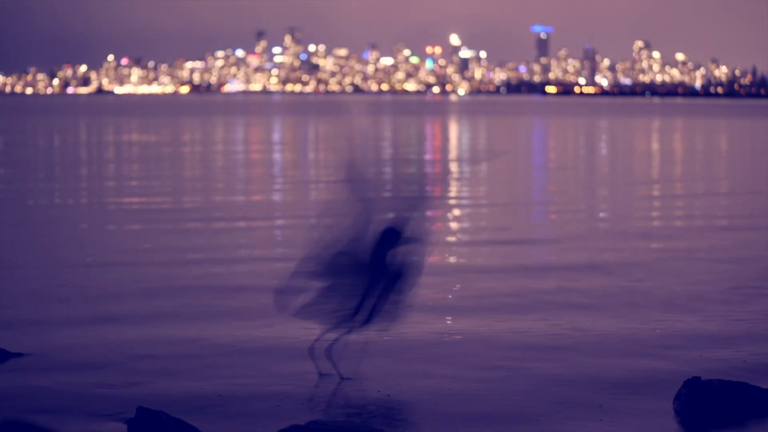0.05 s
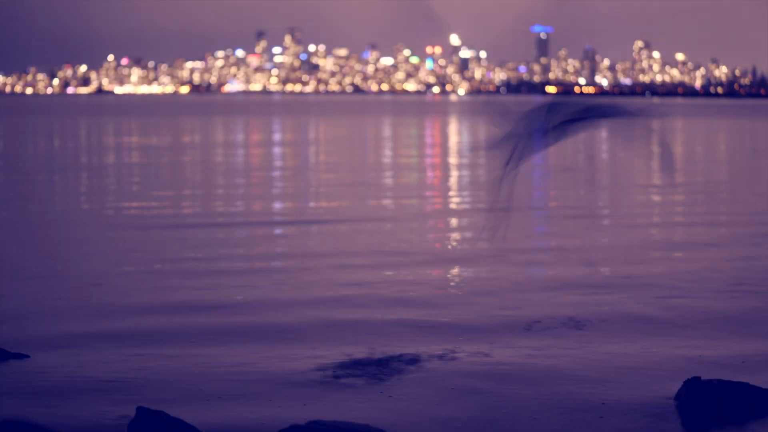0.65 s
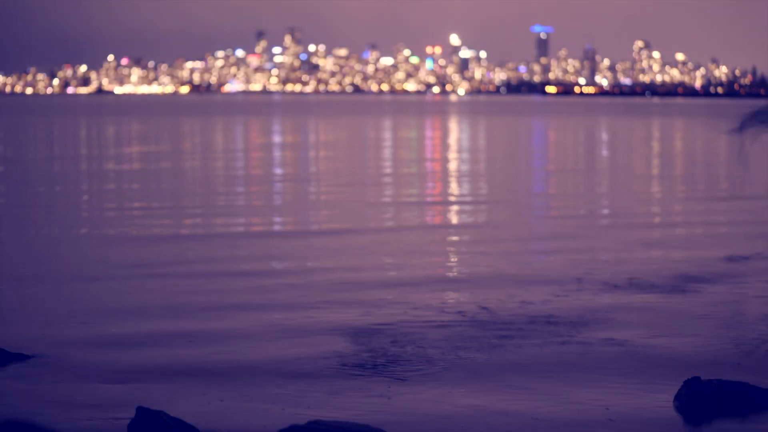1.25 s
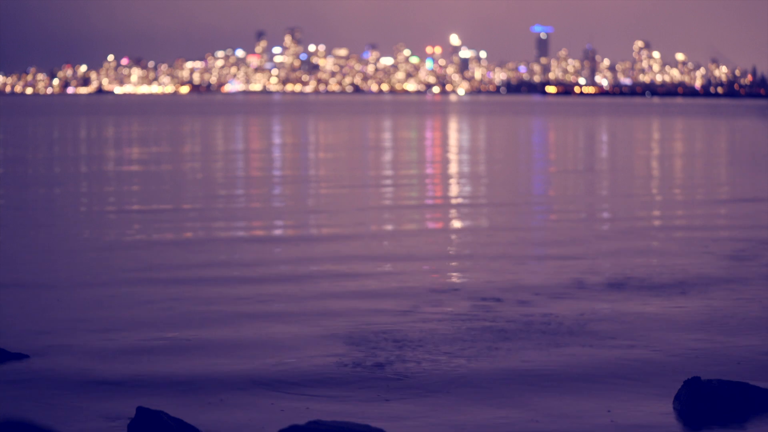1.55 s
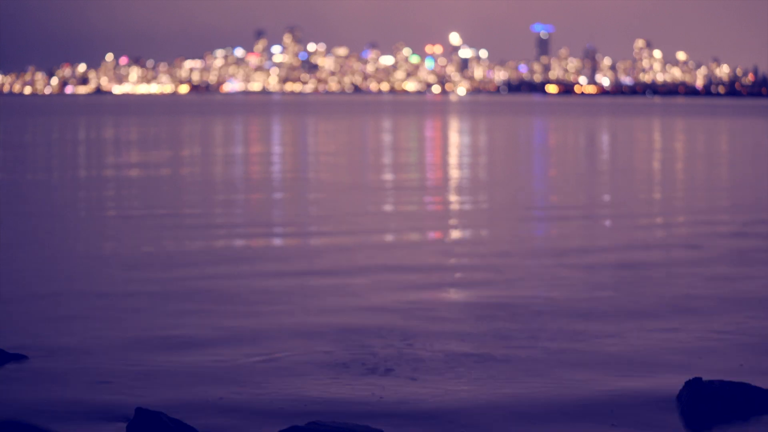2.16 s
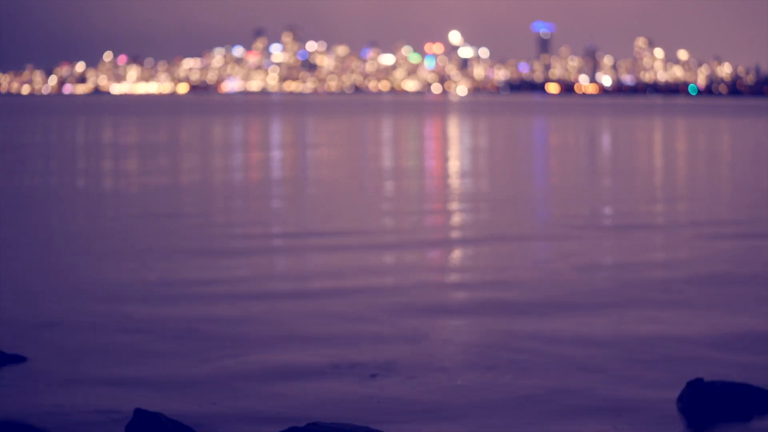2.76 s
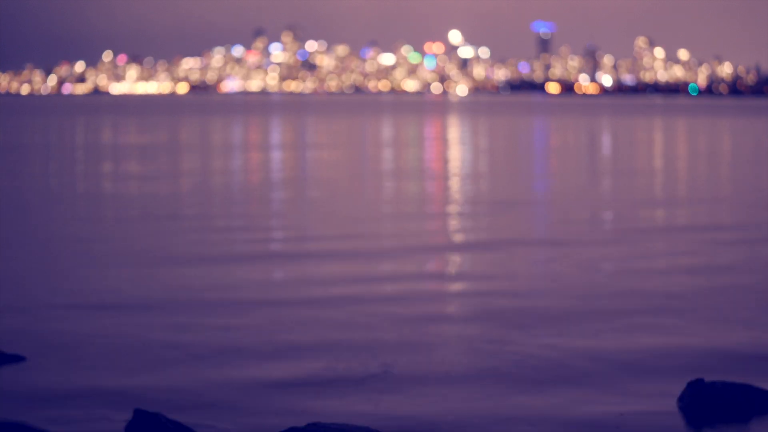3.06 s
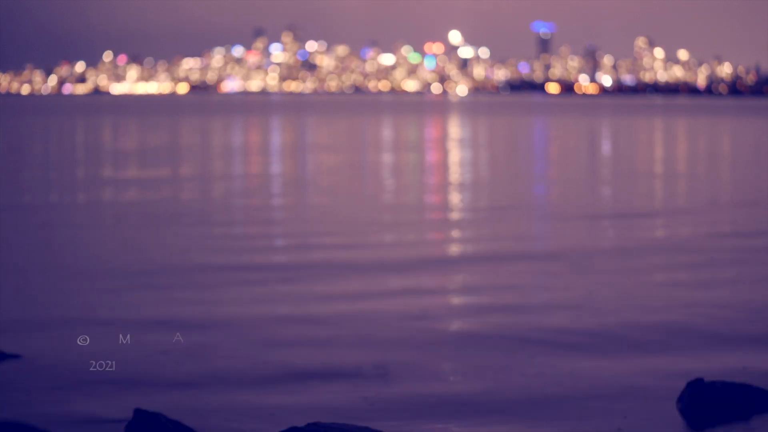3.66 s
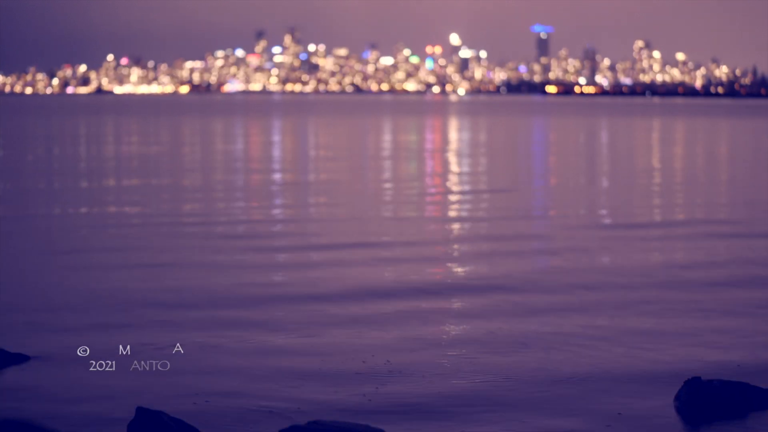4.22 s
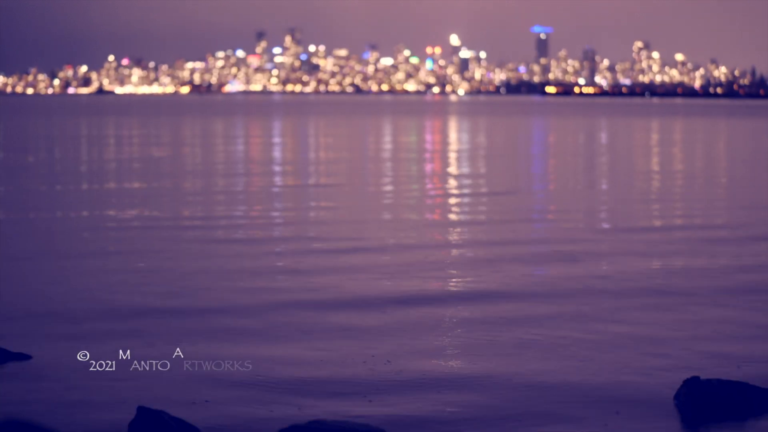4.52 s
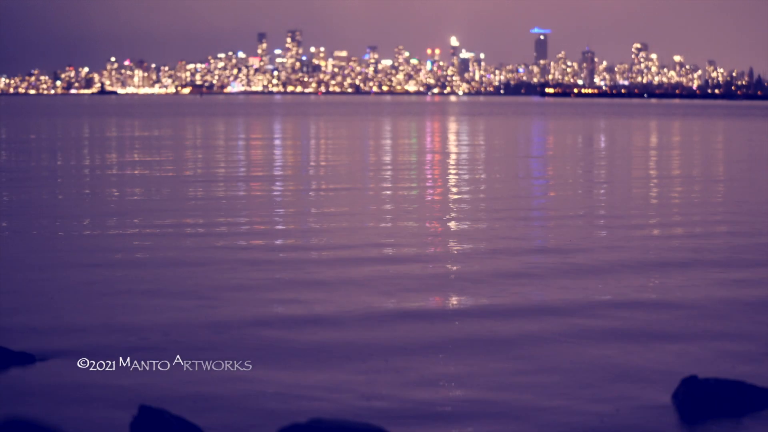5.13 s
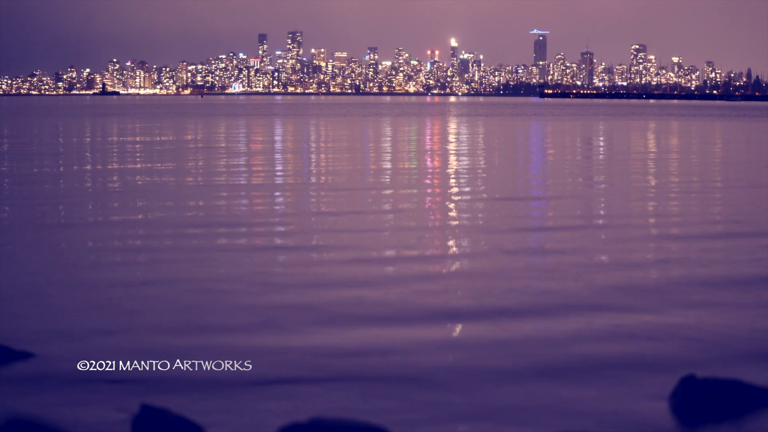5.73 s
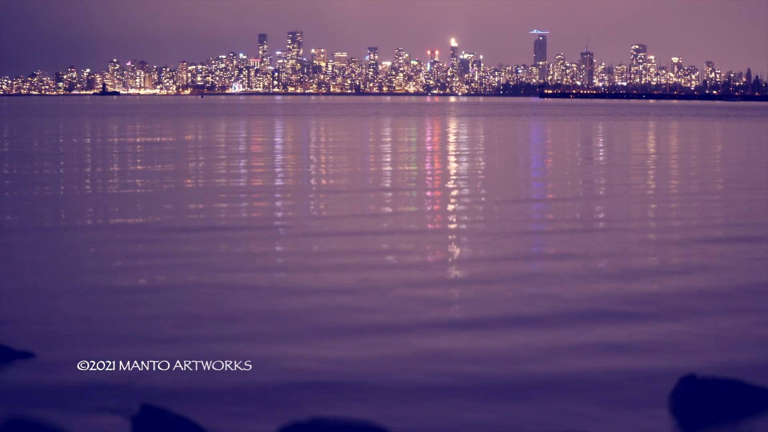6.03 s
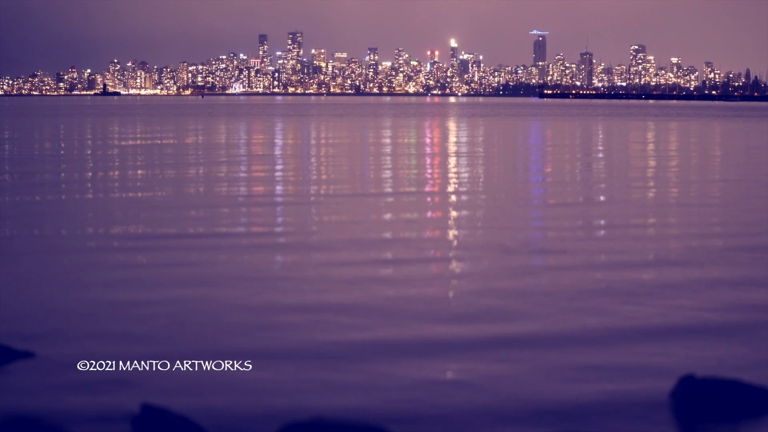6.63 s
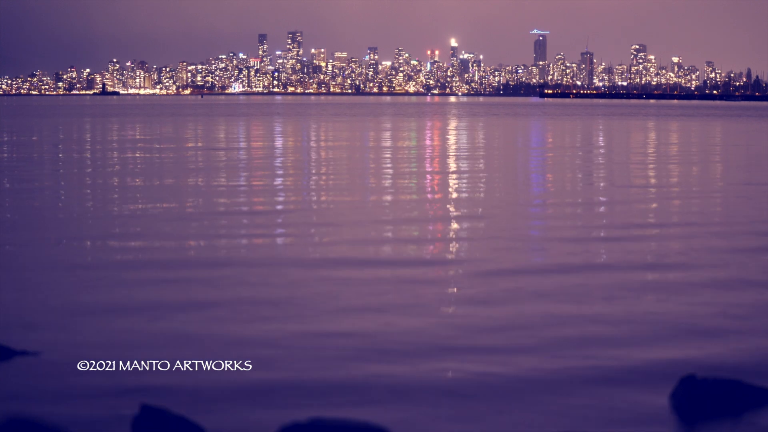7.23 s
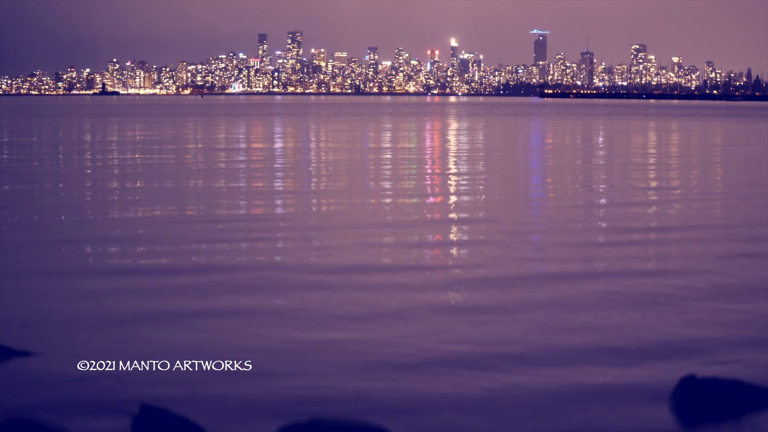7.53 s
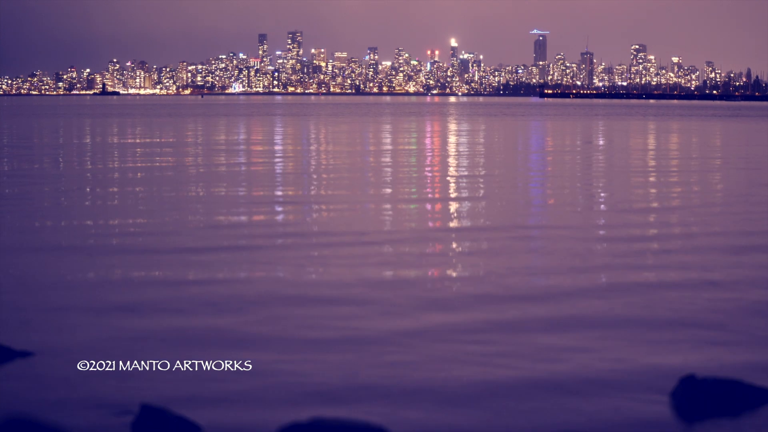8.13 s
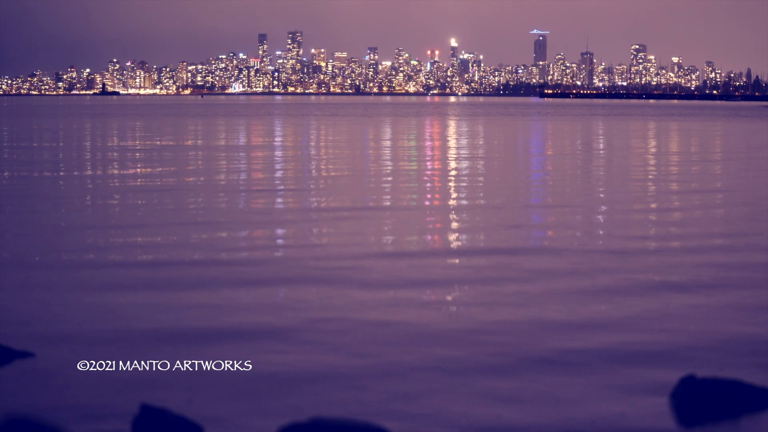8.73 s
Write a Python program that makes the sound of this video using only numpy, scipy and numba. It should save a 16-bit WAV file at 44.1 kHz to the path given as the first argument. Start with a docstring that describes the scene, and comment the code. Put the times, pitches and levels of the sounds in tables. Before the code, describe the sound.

A heron splashes up from shallow water with four harsh squawks, then croaks further off over faint lapping and hiss.

```python
"""A splash comes first: a heron leaves shallow water at night and flies off to the right with four long,
harsh squawks, then gives rattling croaks from further away. Both calls follow the source-filter principle:
pulses of air excite the resonances of throat and bill. Drops fall back from its legs and ring as bubbles,
wavelets lap and plash on the stones, and a few dry clacks sound on the left. The shore scatters the calls
over the murmur of a distant city and a soft hiss."""
import sys
import numpy as np
from scipy import signal
from scipy.fft import rfft, irfft
from scipy.io import wavfile
from numba import njit

SR = 44100
rng = np.random.default_rng(int(sys.argv[2]) if len(sys.argv) > 2 else 0)


def wrap_up_sound(samples):
    """Save the sound to the file named by the first command line argument, as 16-bit audio."""
    columns = np.atleast_2d(samples).T
    # keep every value between -1 and 1, then stretch to whole-number steps
    tamed = np.clip(columns, -1, 1)
    steps = np.round(tamed * 32767).astype(np.int16)
    wavfile.write(sys.argv[1], SR, steps)


N = 391608
T = np.arange(N) / SR
FREQS = np.fft.rfftfreq(N, 1 / SR)

# Spectra of the background, the wash, a plash and the spray. Each row: frequency in Hz, relative level in dB.
CITY_SPECTRUM = [(15, -69), (25, -32), (59, -13), (133, -6.5), (157, -5.5), (241, -2.5), (261, -2.5),
                 (342, -3), (437, -0.5), (749, -2), (955, -1.5), (1550, -7.5), (3050, -9.5), (5090, -11.5),
                 (15800, -14)]
WASH_SPECTRUM = [(150, -39), (450, 1.5), (900, 3.5), (1450, 4), (2100, 0), (3000, -8), (4200, -17.5),
                 (7000, -16.5), (10000, -29.5), (15000, -15)]
PLASH_SPECTRUM = [(200, -16), (700, 1), (1350, 10), (2600, 2), (4200, -4.5), (7000, -4.5), (15000, -16)]
SPRAY_SPECTRUM = [(40, -52), (180, -19), (330, -14), (821, -6.5), (1200, 0.5), (3000, -10.5), (5130, -6.5),
                  (9140, -4), (15500, -8)]
# Likeness of the background at the two ears. Each row: frequency in Hz, correlation.
CITY_COHERENCE = [(100, 1), (300, 0.95), (700, 0.66), (1500, 0), (4000, 0), (15000, 0.081)]
# Wavelets washing over the stones. Each row: start and end in seconds, level in dB.
WAVELET_SWELLS = [(0.695, 2.045, -52.5), (2.286, 3.24, -51), (4.6, 5.6, -52), (6.49, 7.217, -62.5),
                  (7.785, 8.164, -53)]
# Plashes on the stones. Each row: peak time in seconds, relative level in dB, time constant in seconds,
# right minus left in dB.
STONE_PLASHES = [(1.112, -39, 0.0031, 5), (2.743, -42.5, 0.0029, -15), (3.813, -46.5, 0.022, -6),
                 (4.041, -45.5, 0.012, -11), (4.272, -51, 0.0074, -5), (6.889, -49.5, 0.0041, 3),
                 (7.656, -50.5, 0.023, 10), (7.837, -53, 0.02, 9)]
# Spray of the take-off and of water falling back. Each row: start and end in seconds, level in dB,
# fade in dB per second, right minus left in dB, share of power in separate ticks.
SPRAY_BURSTS = [(0, 0.035, -40.5, 198, 8, 0.02), (0.067, 0.152, -38, 638, 8.5, 0.11),
                (0.294, 0.336, -53.5, 78, 4.5, 0.1), (0.458, 0.497, -50.5, 403, 4.5, 0.1),
                (0.565, 1.096, -59.5, 16, 1.5, 0.3), (0.97, 1.13, -60, 178, 3, 0.86),
                (7.12, 7.217, -63, 52, 4.5, .8)]
# The loudest drops. Each row: start in seconds, relative level in dB, initial bubble pitch in Hz,
# right minus left in dB.
LOUD_DROPS = [(.229, -38.5, 7360, 7), (.9003, -47, 10200, 4), (.944, -33.5, 4070, 6),
              (0.967, -35.5, 8260, 3), (.975, -47, 8600, 6), (.982, -43, 8200, 6), (.9912, -33, 9500, 4),
              (1.008, -48, 8700, 4), (1.0245, -41, 14100, 6), (1.0305, -37, 13500, 6),
              (1.1004, -45, 7660, 6), (1.108, -34.5, 2690, 11), (1.109, -31.5, 1367, 8),
              (1.117, -43, 10000, 4), (1.134, -46, 13990, 6), (1.267, -43, 10000, 4),
              (1.316, -38, 12310, 8), (1.847, -50, 1275, 6), (2.022, -44, 955, 6), (2.7274, -42, 5930, 6),
              (2.747, -45, 1510, 6), (2.775, -40, 297, 3), (3.456, -46, 1430, 6), (3.517, -41.5, 713, 9),
              (3.677, -46.5, 2440, 9), (3.795, -43, 10300, 8), (4.017, -45, 1740, 3.5),
              (5.704, -46, 7100, 10), (5.842, -43.5, 10200, 8), (6.799, -46, 8300, 6),
              (6.876, -45, 1280, 10), (7.047, -44, 2700, 14), (7.131, -45, 11000, 8),
              (7.1783, -45, 13000, 6), (7.2, -47, 14000, 6), (7.594, -40, 7100, 4), (7.651, -42, 1400, 8),
              (7.693, -41, 1390, 8), (7.816, -42, 1490, 10), (7.859, -41, 3140, 8),
              (8.2498, -43.5, 8150, 8)]
# Clacks and their bounces, and in the last row a sharp click from the water. Each row: start in seconds,
# relative level in dB, rattle decay time in seconds, # relative snap level in dB.
CLACK_IMPACTS = [(5.033, -30, 0.092, 6.5), (5.042, -33.5, 0.053, -6), (5.287, -38.5, 0.13, -12),
                 (5.5367, -34, 0.044, -12), (5.786, -37, .05, -5), (6.0338, -32, 0.071, -7),
                 (6.039, -37, 0.053, -7), (6.0434, -36.5, .05, -7), (7.3445, -45, 0.056, -5)]
# Resonances of the clacking body, the croak at 70 pulses a second, the open bill, and the rasp and hiss
# above the bill. Each row: frequency in Hz, bandwidth in Hz, relative gain in dB.
CLACK_MODES = [(347, 270, 1.5), (805, 350, -2), (1560, 700, -1.5), (2000, 720, -1), (2760, 510, 2.5),
               (4800, 950, -17)]
CROAK_MODES = [(540, 100, 1), (823, 52, 7.5), (1180, 210, 4.5), (1676, 290, 1), (2100, 340, 0.5),
               (2720, 730, -4.5), (3600, 1500, -20)]
BILL_MODES = [(1146, 55, 5.5), (1444, 470, -0.5), (1699, 45, 2), (1870, 220, 1.5), (2276, 264, -1)]
RASP_MODES = [(2358, 190, -2.5), (2737, 180, 1), (3103, 280, -5.5)]
HISS_MODES = [(3530, 1100, 4), (4490, 1220, 0), (6250, 1900, -16)]
# Croaks. Each row: peak time and half length in seconds, top pulse rate in Hz, relative level in dB,
# top throat resonance in Hz, puff length in seconds.
CROAK_CALLS = [(4.528, 0.085, 67.1, -42, 940, 0.0069), (5.406, 0.13, 77.7, -39.5, 1170, 0.0065),
               (6.339, .135, 80.2, -41.5, 1167, 0.0066), (7.372, 0.1, 70.8, -45.5, 934, 0.012)]
# Squawks. Each row: start, end and attack in seconds, nominal bill centre in Hz,
# chest over bill in dB when slack.
SQUAWK_CALLS = [(0.25, 0.881, 0.0019, 1654, -10), (1.152, 1.681, 0.0024, 1500, -4.5),
                (2.091, 2.638, 0.034, 1820, -3), (2.9, 3.284, 0.019, 2004, 0)]
# Registers, one list per squawk. Each row: time in seconds, relative levels of bill, throat and rasp in dB.
REGISTER_LEVELS = [
    [(0.256, -36, -31.5, -43.5), (0.29, -31, -30, -39), (0.38, -34, -40, -42), (0.478, -31.5, -32, -46),
     (0.53, -32.5, -35, -46), (0.542, -30, -30.5, -48.5), (0.635, -30.5, -36, -43.5),
     (0.655, -29.5, -37.5, -38), (0.734, -30, -36, -37), (0.752, -33, -35, -43), (0.778, -32, -38, -40),
     (0.81, -30.5, -32, -33.5), (0.836, -29, -32.5, -38.5), (0.878, -32, -36, -37.5)],
    [(1.156, -58, -45, -50), (1.168, -49, -35.5, -47.5), (1.224, -43.5, -43.5, -42),
     (1.294, -42.5, -42.5, -40), (1.336, -40.5, -36, -41), (1.36, -41, -44, -42), (1.388, -39.5, -36, -41),
     (1.418, -39, -40.5, -41.5), (1.462, -42.5, -37, -38.5), (1.488, -36.5, -35, -45),
     (1.526, -39.5, -34.5, -44.5), (1.626, -34, -30, -47.5), (1.68, -38, -39.5, -50)],
    [(2.092, -50, -49, -62), (2.102, -45, -39.5, -60), (2.158, -44.5, -44.5, -55), (2.258, -42, -36, -52),
     (2.342, -46, -46.5, -53), (2.358, -40.5, -42, -57), (2.398, -44, -33.5, -51),
     (2.422, -40.5, -38.5, -52), (2.48, -39.5, -36.5, -48), (2.576, -36, -36, -46),
     (2.588, -39.5, -45, -45), (2.6, -37, -35, -46), (2.635, -42, -43, -51)],
    [(2.908, -54, -50, -69), (2.936, -50, -47, -60), (2.968, -52, -60, -60), (2.984, -46.5, -46.5, -56),
     (3.048, -47, -58, -56), (3.074, -46.5, -47, -54), (3.12, -44, -50, -54), (3.134, -43, -37, -52),
     (3.146, -45, -36.5, -50), (3.186, -42.5, -42, -51.5), (3.226, -40.5, -38, -52),
     (3.274, -48.5, -39, -53), (3.28, -47.5, -44, -58)],
]
# Hiss, one list per squawk. Each row: time in seconds, relative level in dB.
HISS_ENVELOPES = [
    [(0.255, -50), (0.289, -47), (0.387, -53), (0.437, -47.5), (0.601, -53.5), (0.623, -51), (0.875, -56)],
    [(1.16, -53.5), (1.21, -50), (1.378, -51.5), (1.388, -44), (1.42, -52), (1.652, -51.5), (1.675, -60)],
    [(2.1, -59), (2.114, -52.5), (2.252, -53), (2.344, -64), (2.378, -60.5), (2.556, -55), (2.63, -59)],
    [(2.91, -65), (2.974, -61), (3.126, -63), (3.172, -60), (3.18, -63), (3.244, -62), (3.28, -67)],
]
# Throat pitch climbing, wavering and falling, one list per squawk. Each row: time in seconds, pitch in Hz.
PITCH_CONTOURS = [
    [(.25, 872), (.38, 907), (.465, 1130), (.51, 1089), (.55, 950), (.71, 1000), (.82, 939), (.88, 790)],
    [(1.15, 754), (1.2, 868), (1.24, 838), (1.31, 910), (1.5, 897), (1.62, 922), (1.685, 777)],
    [(2.09, 831), (2.15, 815), (2.25, 899), (2.34, 845), (2.42, 913), (2.53, 881), (2.6, 850), (2.64, 821)],
    [(2.9, 820), (3.0, 890), (3.08, 851), (3.16, 895), (3.23, 854), (3.285, 804)],
]
# Extra tones on which the voice catches. Each row: start and end in seconds, first pitch, last pitch
# and waver in Hz, relative level in dB.
VOICE_CATCHES = [(.292, .308, 3700, 4000, 400, -39.5), (.41, 0.45, 1880, 1820, 33, -36),
                 (.535, 0.629, 1914, 1775, 59, -32), (.58, 0.658, 567, 572, 27, -40),
                 (.622, 0.643, 3550, 3890, 300, -42), (.738, .775, 600, 585, 47, -38),
                 (.82, 0.874, 590.6, 510, 53, -39), (.822, 0.864, 2080, 1970, 27, -35),
                 (1.152, 1.183, 501, 542, 62, -44.5), (1.613, 1.624, 927, 895, 20, -29),
                 (1.622, 1.669, 570.6, 509, 51, -45), (2.12, 2.153, 610, 634, 23, -45),
                 (2.477, 2.499, 900, 900, 20, -29), (2.5, 2.587, 595, 545, 42, -44),
                 (2.594, 2.607, 860, 827, 21.9, -31.5), (2.93, 3.045, 621, 683, 22, -50)]


def undb(db):
    """Decibels to amplitude ratio."""
    return 10 ** (np.asarray(db) / 20)


def unit(x):
    """Normalisation to rms 1."""
    return x / np.sqrt(np.mean(x ** 2))


def curves(contours):
    """Linear interpolation in time of each column of the joined contours."""
    times, *columns = np.vstack(contours).T
    return [np.interp(T, times, column) for column in columns]


def nearest(table, centres):
    """Nearest-neighbour lookup: the columns of the event closest to each moment."""
    return np.array(table)[np.searchsorted((centres[1:] + centres[:-1]) / 2, T)].T


def swell(start, end, db, rise, fade):
    """Exponential rise and decay around a level held from start to end; slopes in dB per second."""
    return undb(db - rise * np.maximum(start - T, 0) - fade * np.maximum(T - end, 0))


def wander(per_second):
    """Interpolated noise: a slow random fluctuation with a spread near 1."""
    steps = rng.standard_normal(N // 20)
    return 0.926 * np.interp(T * per_second, np.arange(len(steps)), steps)


def across(points):
    """Interpolation of (Hz, value) points on a log-frequency axis."""
    hz, value = np.transpose(points)
    return np.interp(np.log(FREQS + 1), np.log(hz), value)


def colour(x, spectrum):
    """Spectral shaping under which white noise keeps its power."""
    return irfft(rfft(x) * unit(undb(across(spectrum))), N)


def pan(x, right_db):
    """An interaural level difference leans a sound to one side."""
    return x * undb(np.array([[-1], [1]]) * right_db / 2)


def head_shadow(x, right_db):
    """Diffraction: the bass bends round to both ears alike, while higher sound favours one."""
    return irfft(pan(rfft(x), across([(220, 0), (900, right_db)])), N)


def blend(pair, coherence):
    """Mid-side mixing gives two independent channels a set correlation at each frequency."""
    correlation = np.clip(across(coherence), -.99, .99)
    mid, side = rfft(pair) * np.sqrt([(1 + correlation) / 2, (1 - correlation) / 2])
    return irfft([mid + side, mid - side], N)


@njit
def bandpass(x, hz, width):
    """A state-variable resonator with gain 1 at its moving centre."""
    y, band_state, low_state = np.empty(len(x)), 0., 0.
    for i in range(len(x)):
        g, damping = np.tan(np.pi * hz[i] / SR), width / hz[i]
        band = (band_state + g * (x[i] + 1e-18 - low_state)) / (1 + g * (g + damping))
        band_state, low_state = 2 * band - band_state, low_state + 2 * g * band
        y[i] = damping * band
    return y


def resonate(x, hz, width):
    """Two resonators in cascade give a resonance with steep skirts."""
    centre = hz + np.zeros(N)
    return bandpass(bandpass(x, centre, 1.03 * width), centre, 1.03 * width)


def ring(x, modes, stretch=1):
    """Modal superposition in a tube or body; neighbouring modes ring in opposite phase."""
    return sum((-1) ** k * undb(db) * resonate(x, hz * stretch, width)
               for k, (hz, width, db) in enumerate(modes))


def fizz(per_second, spread_db):
    """Shot noise: tiny bursts of uneven size, independent at each ear."""
    sizes = undb(spread_db * np.minimum(rng.exponential(size=(2, N)), 5))
    return unit((rng.random((2, N)) < per_second / SR) * sizes * rng.choice([-1, 1], (2, N)))


def shore(x, right_db, shadow_db, scatter_db, tail_db, scatter_t60):
    """Multipath propagation: stones scatter, the bank adds a tail, the far ear hears later and duller."""
    t, sides = T[:SR], np.array([[-1], [1]])
    # the paths over water and stones keep changing: two sets of echoes fade in and out in turn
    turn = 2 * np.pi * 1.7 * T + wander(2.98)
    echoes = 0
    for share in (np.cos(turn), np.sin(turn)):
        noise = rng.standard_normal((2, 2, SR))
        stones = sides * unit(noise[0, 0] * undb(-60 * t / scatter_t60)) * undb(scatter_db)
        bank = unit(noise[1] * undb(-60 * t / 0.19) * np.minimum(t / 0.084, 1)) * undb(tail_db)
        response = (stones + bank) / np.sqrt(SR)
        echoes = echoes + signal.fftconvolve((x * share)[None], response, axes=1)[:, :N]
    echoes = signal.sosfilt(signal.butter(1, 1050, "high", fs=SR, output="sos"), echoes)
    ear_delay_s = 90e-6 * np.sign(shadow_db)
    direct = rfft(x) * np.exp(1j * np.pi * FREQS * ear_delay_s * sides)
    shadow = across([(600, 0.0093), (2000, shadow_db), (5000, 1.57 * shadow_db)])
    return irfft(pan(direct + rfft(echoes), right_db + shadow), N)


def city():
    """A diffuse field, coherent only at low frequencies: the far city's murmur under a smooth hiss."""
    noise = blend(rng.standard_normal((2, N)), CITY_COHERENCE)
    return pan(colour(noise, CITY_SPECTRUM) * undb(-57 + 0.033 * wander(2.8)), right_db=-0.5)


def bubbles(per_second, spread_db, quality):
    """Bubble resonance: swarms of many sizes each ring briefly and add up to a broadband froth."""
    out, bands = np.zeros((2, N)), 22
    count = int(per_second * N / SR / bands)
    for hz in np.geomspace(400, 13000, bands):
        sizes = undb(spread_db * np.minimum(rng.exponential(size=count), 5)) * rng.choice([-1, 1], count)
        births = np.bincount(rng.integers(0, 2 * N, count), sizes, 2 * N).reshape(2, N)
        out += unit(signal.lfilter(*signal.iirpeak(hz, quality, fs=SR), births)) * np.sqrt(hz)
    return unit(out)


def wavelets():
    """Amplitude-modulated bubble noise: wavelets add in power to a steady ripple and plash on stones."""
    froth = unit(bubbles(per_second=5000, spread_db=3, quality=12.3) + 1.25 * rng.standard_normal((2, N)))
    swill = blend(froth, [(250, 1.0), (700, 0.53), (1500, 0.022), (4000, 0.019)])
    # tiny bubbles burst in the wash
    prickle = colour(fizz(per_second=490, spread_db=4),
                     [(2000, -45), (4500, -8), (7000, -15), (10000, -17.5), (15000, -6.5)])
    ripple_power = undb(-65) ** 2
    wavelet_power = sum(swell(*wavelet, rise=38, fade=20.5) ** 2 for wavelet in WAVELET_SWELLS)
    wash = np.sqrt(ripple_power + wavelet_power) * undb(1.4 * wander(25))
    laps = (colour(swill, WASH_SPECTRUM) + undb(-17.5) * prickle) * wash
    surge = sum(pan(undb(db) * np.exp(-np.abs(T - peak) / tau), side_db)
                for peak, db, tau, side_db in STONE_PLASHES)
    plashes = surge * colour(swill, PLASH_SPECTRUM) * undb(-5)
    return head_shadow(laps, right_db=9.5) + plashes


def foam():
    """Band-limited shot noise: tiny bubbles burst in clusters as the last wavelet breaks."""
    pops = fizz(per_second=1400, spread_db=5)
    crackle = unit(np.array([resonate(ear, hz=6760, width=4200) for ear in pops]))
    clusters = undb(2.5 * wander(60))
    return pan(crackle * clusters * swell(start=7.64, end=7.9, db=-65.5, rise=150, fade=52), right_db=-1)


def spray():
    """Superposed impacts of thrown water: a dense sheet at take-off thins to ticks as it falls back."""
    sheet = blend(fizz(per_second=7600, spread_db=2.5), [(400, 1.0), (1500, 0)])
    ticks = fizz(per_second=260, spread_db=3.5)
    out = 0
    for start, end, db, fade, side_db, share in SPRAY_BURSTS:
        texture = np.sqrt(1 - share) * sheet + np.sqrt(share) * ticks
        out = out + pan(swell(start, end, db, rise=400, fade=fade), side_db) * texture
    return colour(out, SPRAY_SPECTRUM) * undb(1.2 * wander(54))


def drops(ring_cycles=74, longest_ring_s=0.056, strays_per_second=1.1):
    """Damped oscillation: a drop ticks and leaves a bubble rising in pitch; small ones die sooner."""
    out, t = np.zeros((2, N)), T[:SR // 5]
    chance = rng.random((int(strays_per_second * T[-1]), 3))
    strays = [(when * T[-1], -48 + 8 * (size - .5), 8060 * 2 ** (pitch - .5), 6)
              for when, size, pitch in chance]
    for start, db, hz, side_db in LOUD_DROPS + strays:
        t60 = min(ring_cycles / hz, longest_ring_s)
        tick = 0.53 * min(hz / 6000, 1) * rng.standard_normal((2, len(t))) * np.exp(-t / 0.0013)
        rising_hz = hz * (1 + 0.14 * np.minimum(t / t60, 1))
        bubble = np.sin(2 * np.pi * np.cumsum(rising_hz) / SR) * undb(-60 * t / t60)
        at = int(start * SR)
        out[:, at:at + len(t)] += pan(undb(db) * (0.56 * bubble + tick), side_db)[:, :N - at]
    return out


def clacks():
    """Impact excitation: a hard contact snaps, and a short rattle rings a small, well damped body."""
    blows, snaps = np.zeros((2, N))
    t = T[:SR // 4]
    for start, db, t60, snap_db in CLACK_IMPACTS:
        rattle = rng.standard_normal(len(t)) * undb(db + 5.5 - 60 * t / t60)
        at = int(start * SR)
        blows[at:at + len(t)] += rattle
        blows[at] += undb(db + 25)
        snaps[at] += undb(db + snap_db + 24)
        snaps[at:at + len(t)] += rattle * np.exp(-t / 0.0025)
    return ring(blows, CLACK_MODES) - undb(-6.5) * resonate(snaps, 4800, 1300) + undb(-38) * snaps


def croaks(rate_sag=0.33, throat_sag=0.46, fade_db=18):
    """Pulse excitation: effort peaks mid-call, quickens the puffs and lifts the throat resonance."""
    peak, half, top_rate, db, throat_hz, puff_s = nearest(CROAK_CALLS, np.array(CROAK_CALLS)[:, 0])
    slack = np.minimum(np.abs(T - peak) / half, 1)
    sounding = slack < 1
    rate = top_rate * (1 - rate_sag * slack)
    cycles = top_rate * (T - peak) * (1 - rate_sag * slack / 2)  # integral of the rate
    slaps = np.diff(np.floor(cycles), prepend=0) > 0
    age = cycles % 1 / rate
    puffs = np.exp(-(age / puff_s) ** 4) * rng.standard_normal(N)
    source = sounding * (7 * slaps + puffs) / np.sqrt(puff_s)
    throat = resonate(source, throat_hz * (1 - throat_sag * slack), 275)
    voice = ring(source, CROAK_MODES, stretch=(rate / 70) ** 0.74) + undb(9.5) * throat
    return unit(voice) * np.sqrt(np.mean(sounding)) * undb(db - fade_db * slack ** 1.5)


def membranes(rate, jitter, shimmer_db):
    """Chaotic vibration: membranes slap with uneven timing and force, each with a turbulent puff."""
    timing, force = rng.standard_normal((8000, 2)).T
    at = np.searchsorted(np.cumsum(rate) / SR, np.cumsum(np.exp(jitter * timing)))
    slaps = np.bincount(at[at < N], undb(shimmer_db * force[at < N]), N) / np.sqrt(rate)
    airflow = signal.lfilter([1], [1, -np.exp(-1 / (0.005 * SR))], slaps)
    return unit(slaps) + unit(airflow * rng.standard_normal(N))


def catches(ramp_s=0.006):
    """Frequency modulation: brief tones, chesty or shrill, break out of the rasp, waver and glide."""
    out, waver, shake = np.zeros(N), wander(400), unit(undb(1.8 * wander(110)))
    for start, end, first_hz, last_hz, waver_hz, db in VOICE_CATCHES:
        span = slice(int((start - ramp_s) * SR), int((end + ramp_s) * SR))
        t = T[span]
        hz = np.interp(t, [start, end], [first_hz, last_hz]) + waver_hz * waver[span]
        envelope = np.clip(.5 + np.minimum(t - start, end - t) / (2 * ramp_s), 0, 1)
        out[span] += np.sqrt(2) * undb(db) * envelope * shake[span] * np.sin(2 * np.pi * np.cumsum(hz) / SR)
    return out


def squawks(slap_hz=282.6, rattle_s=0.05, chest_hz=652.5):
    """Source and filter: chaotic pulses ring chest, throat and bill; tension lifts the resonances."""
    midpoints = np.array(SQUAWK_CALLS)[:, :2].mean(axis=1)
    start, end, attack, bill_hz, chest_db = nearest(SQUAWK_CALLS, midpoints)
    bill_db, throat_db, rasp_db = curves(REGISTER_LEVELS)
    hiss_db, = curves(HISS_ENVELOPES)
    pitch, = curves(PITCH_CONTOURS)
    # each call is one arch of tension that peaks early; its slack ends are lower and more chesty
    progress = np.clip((T - start) / (end - start), 0, 1)
    tension = np.sin(np.pi * progress ** 0.86)
    slack = 1 - tension
    # at both ends the pressure is low and the pulses slow to a rattle
    rattle = np.exp(-(np.minimum(np.abs(T - start), np.abs(T - end)) / rattle_s) ** 2)
    pulses = membranes(slap_hz * (1 - 0.58 * rattle), jitter=0.3, shimmer_db=-1)
    opening_puff = undb(8) * np.exp(-np.abs(T - start - .002) / .003) * rng.standard_normal(N)
    source = pulses + opening_puff
    # where the throat outweighs the bill it locks into a wavering tone; elsewhere it is mostly rasp
    phase = 2 * np.pi * np.cumsum(pitch * (1 + 0.02006 * wander(160))) / SR
    tone = unit(np.sin(phase) * undb(3.2 * wander(120)))
    locked = np.interp(bill_db - throat_db, [-7, 7], [.65, .25]) * (1 - rattle)
    throat = np.sqrt(locked) * tone + np.sqrt(1 - locked) * unit(resonate(source, pitch, 230))
    chest_centre = chest_hz * (1 - 0.22 * slack + 0.0074 * wander(25.3))
    chest = unit(resonate(source, chest_centre, 120)) + undb(-13.5) * unit(resonate(source, 474, 420))
    # the resonances of the bill tremble a little and ride up and down with the throat
    stretch = (1.02 - 0.04 * slack) * (1 + 0.03 * wander(30.28)) * (pitch / 920) ** 0.2
    bill = unit(bandpass(ring(source, BILL_MODES, stretch), bill_hz * stretch, 700.0))
    rasp = unit(ring(source, RASP_MODES, stretch)) * undb(rasp_db + 0.5)
    hiss = unit(ring(source, HISS_MODES, stretch)) * undb(hiss_db + 1.5)
    body = (chest * undb(chest_db - 7.5 * tension) - bill) * undb(bill_db)
    voice = throat * undb(throat_db - 0.05) + body - rasp + hiss
    # the air comes in uneven shoves that shake all registers together
    shoves = unit(undb(1.3 * wander(170)))
    gate = np.clip(1 + (T - start) / attack, 0, 1) * np.clip(1 - (T - end) / 0.013, 0, 1)
    return (voice * shoves + catches()) * gate


def scene():
    """Linear superposition of the bird, the water and the night around them."""
    near = shore(squawks(), right_db=0.5, shadow_db=5, scatter_db=-7.5, tail_db=-11.5, scatter_t60=0.013)
    far = shore(croaks(), right_db=2, shadow_db=5, scatter_db=-4, tail_db=-15, scatter_t60=0.016)
    knocks = shore(clacks(), right_db=4.5, shadow_db=-8, scatter_db=-8, tail_db=-29, scatter_t60=0.0076)
    water = drops() + spray() + foam() + wavelets()
    return city() + water + knocks * undb(-2) + far * undb(-0.3) + near * undb(0.4)


def record(dry, cutoff_hz=15850):
    """Band limiting: a steep low-pass filter removes the highest treble."""
    return signal.sosfilt(signal.ellip(10, .1, 75, cutoff_hz, fs=SR, output="sos"), dry)


dry = scene()
out = record(dry)
wrap_up_sound(out)
```